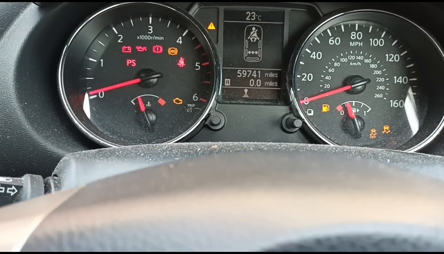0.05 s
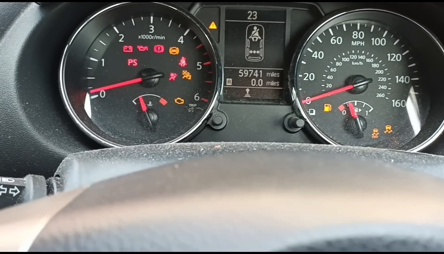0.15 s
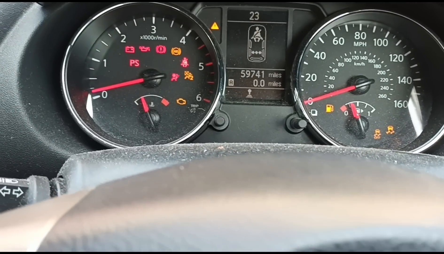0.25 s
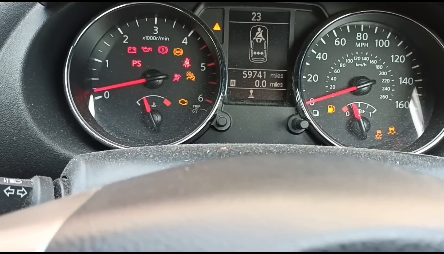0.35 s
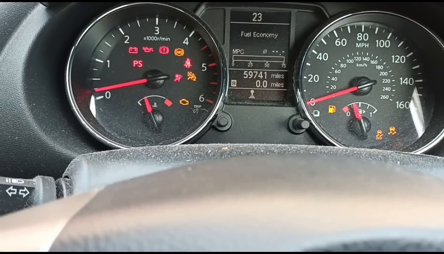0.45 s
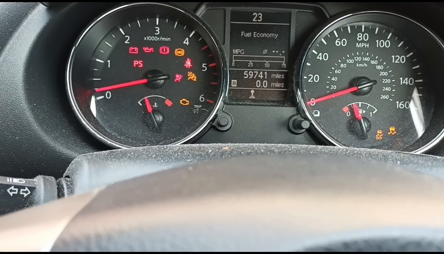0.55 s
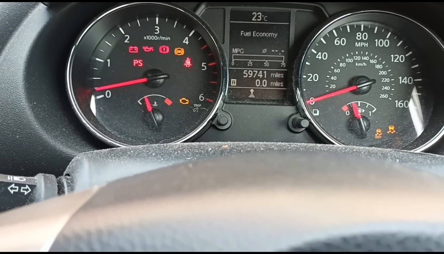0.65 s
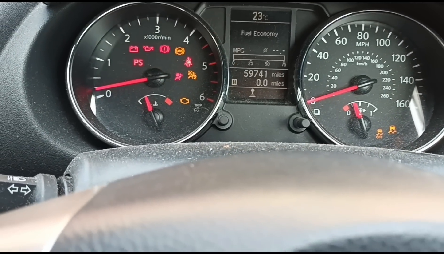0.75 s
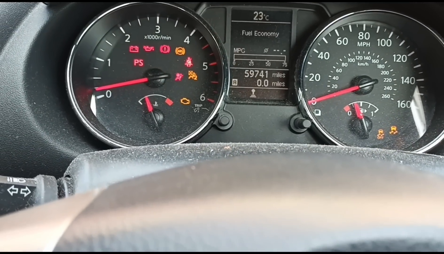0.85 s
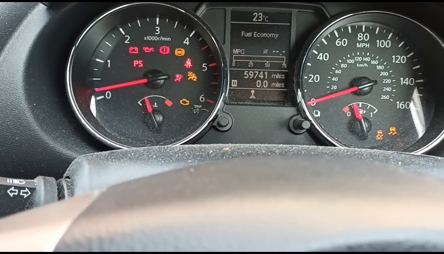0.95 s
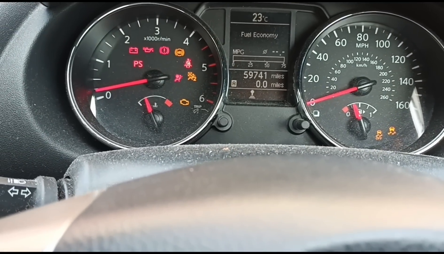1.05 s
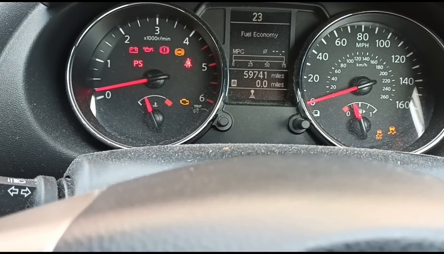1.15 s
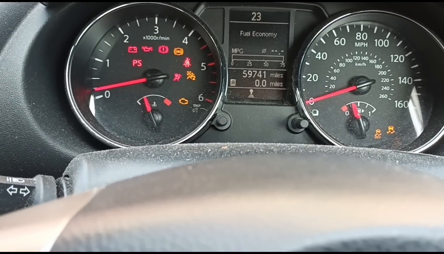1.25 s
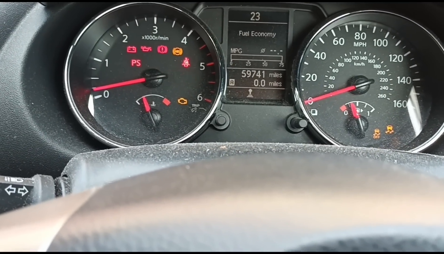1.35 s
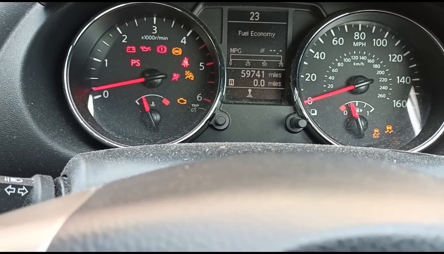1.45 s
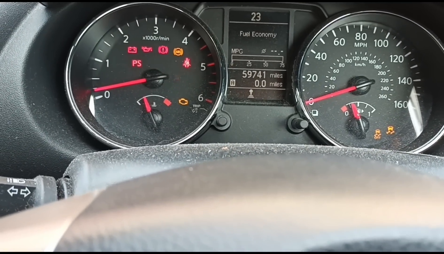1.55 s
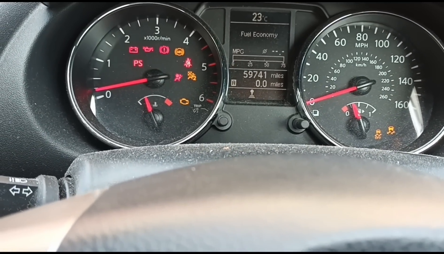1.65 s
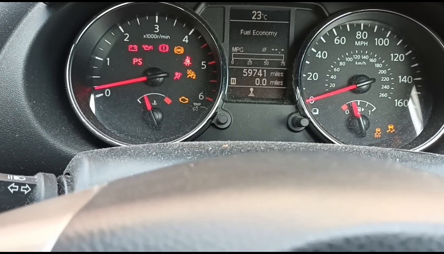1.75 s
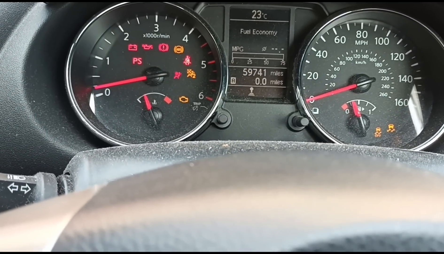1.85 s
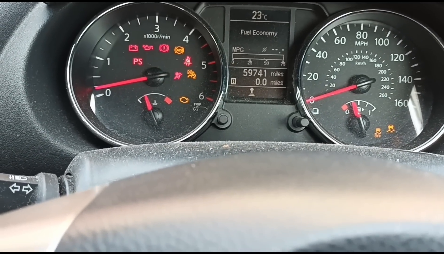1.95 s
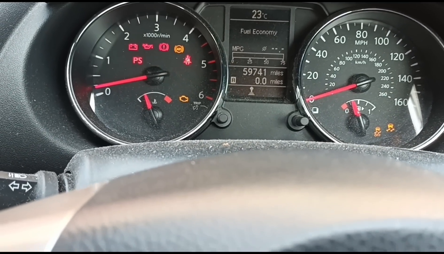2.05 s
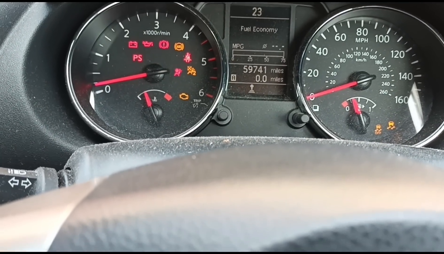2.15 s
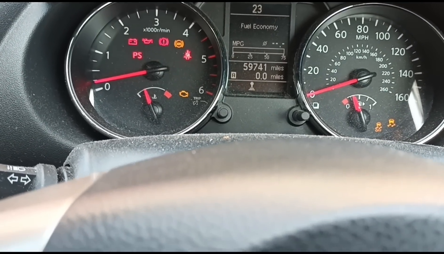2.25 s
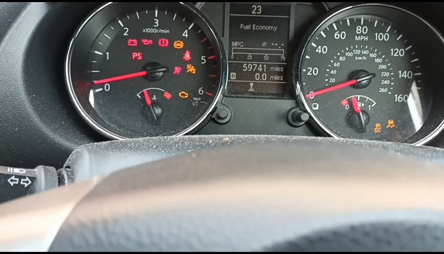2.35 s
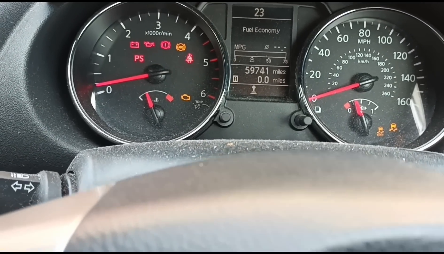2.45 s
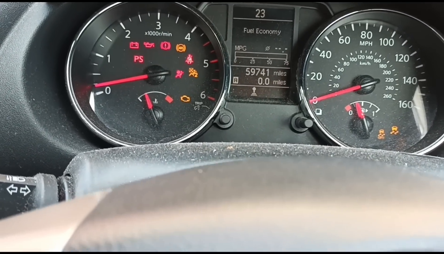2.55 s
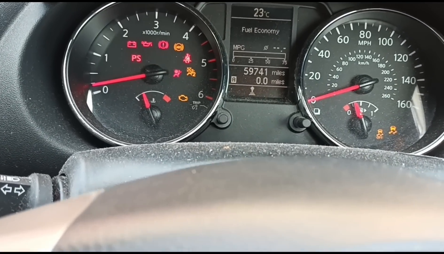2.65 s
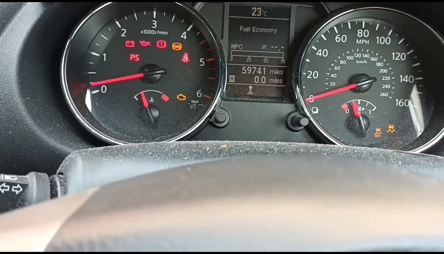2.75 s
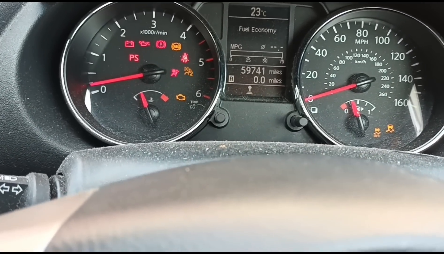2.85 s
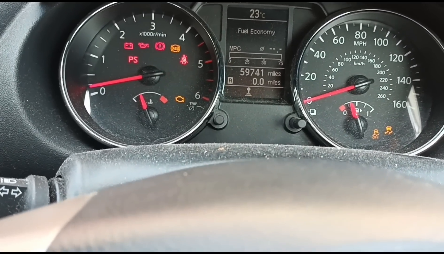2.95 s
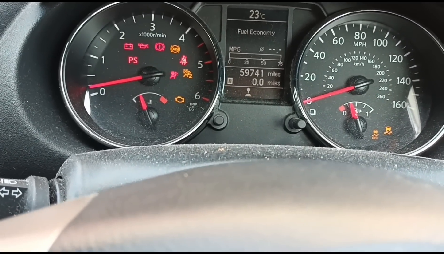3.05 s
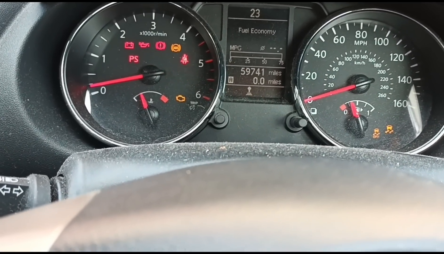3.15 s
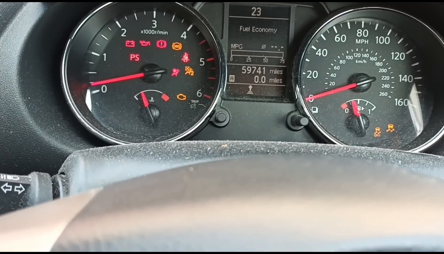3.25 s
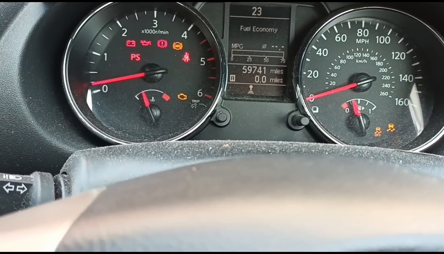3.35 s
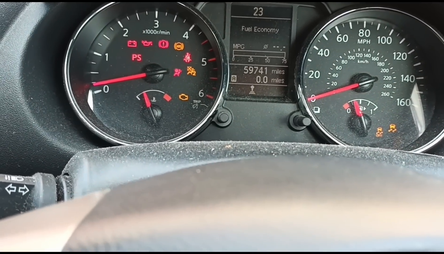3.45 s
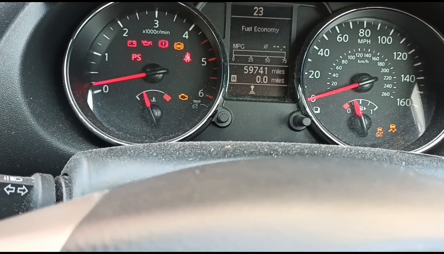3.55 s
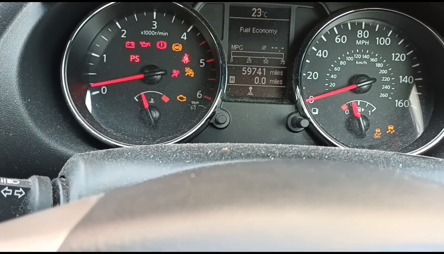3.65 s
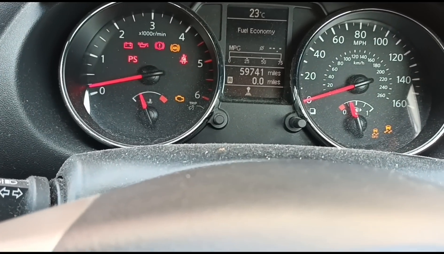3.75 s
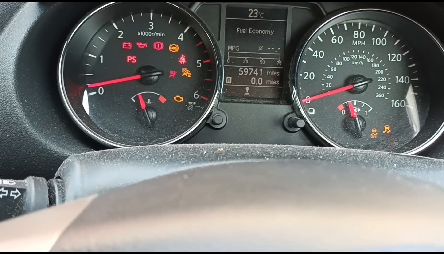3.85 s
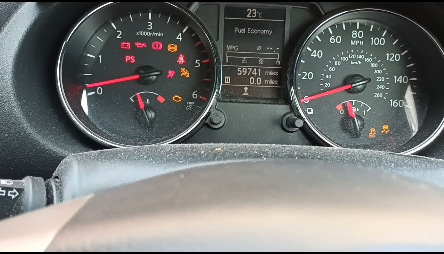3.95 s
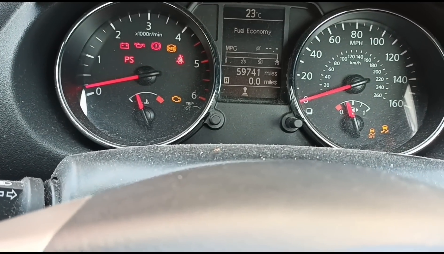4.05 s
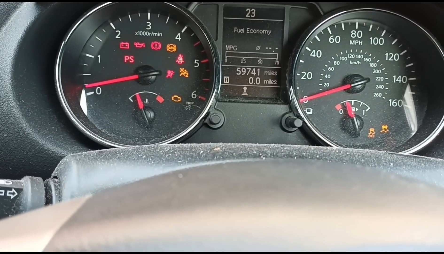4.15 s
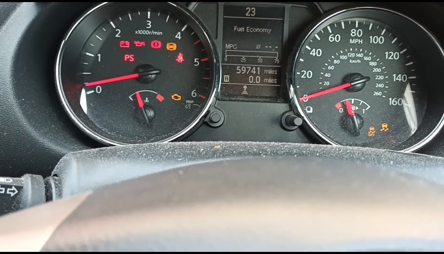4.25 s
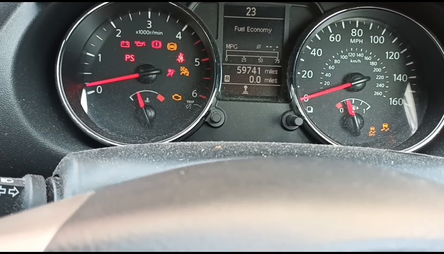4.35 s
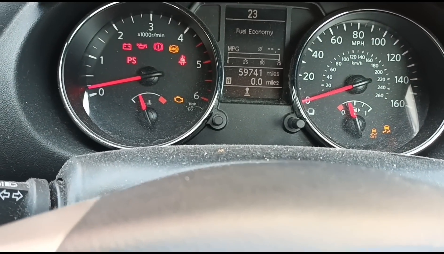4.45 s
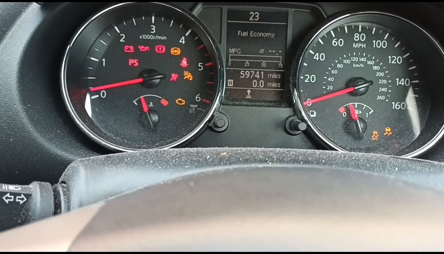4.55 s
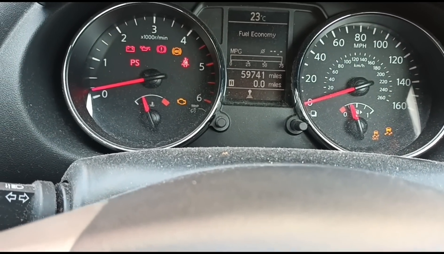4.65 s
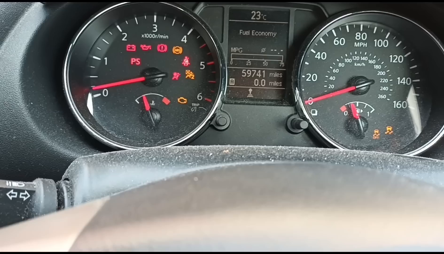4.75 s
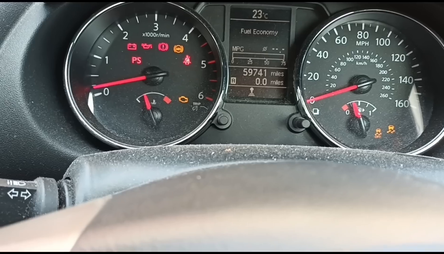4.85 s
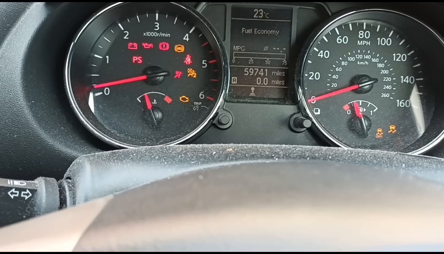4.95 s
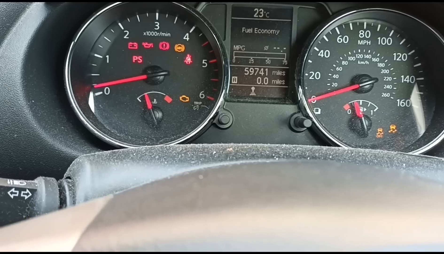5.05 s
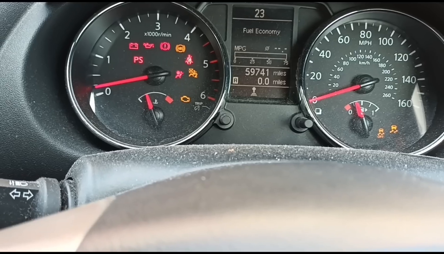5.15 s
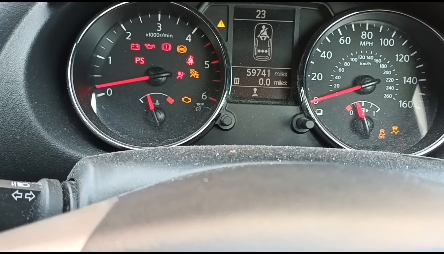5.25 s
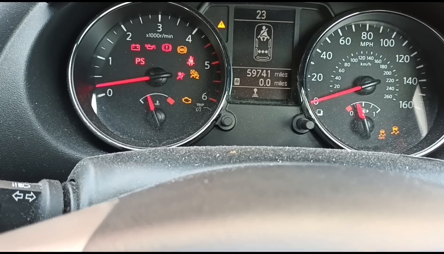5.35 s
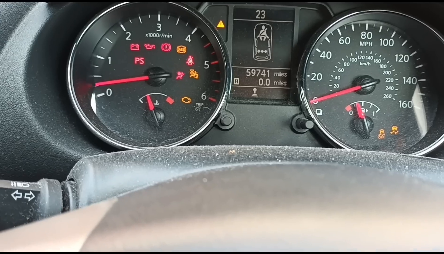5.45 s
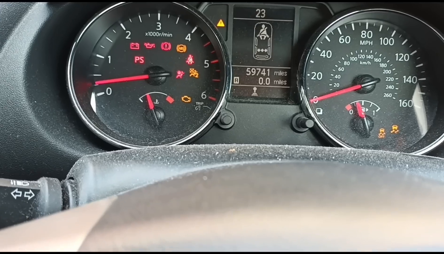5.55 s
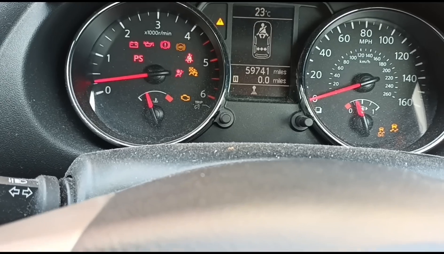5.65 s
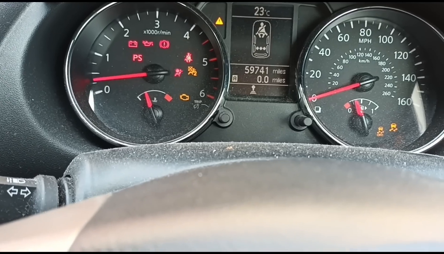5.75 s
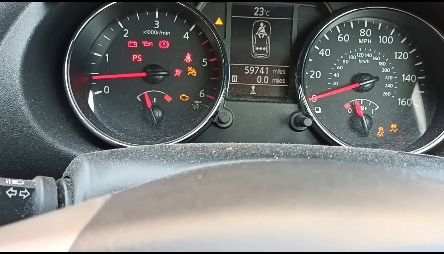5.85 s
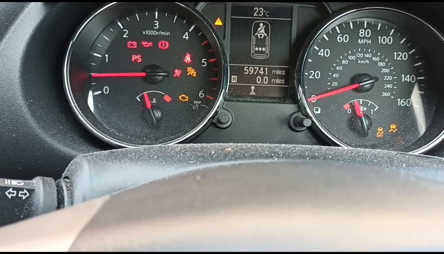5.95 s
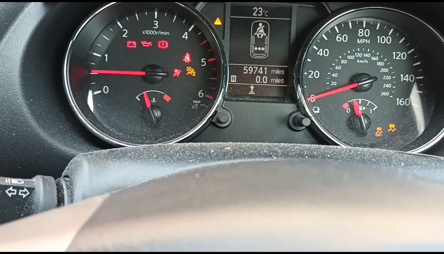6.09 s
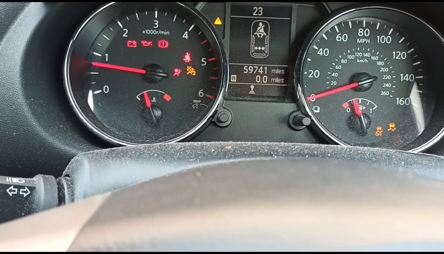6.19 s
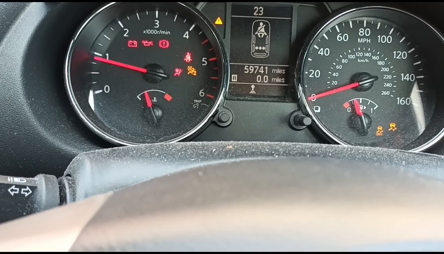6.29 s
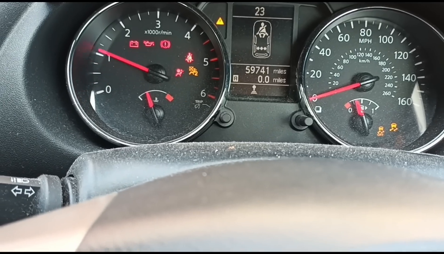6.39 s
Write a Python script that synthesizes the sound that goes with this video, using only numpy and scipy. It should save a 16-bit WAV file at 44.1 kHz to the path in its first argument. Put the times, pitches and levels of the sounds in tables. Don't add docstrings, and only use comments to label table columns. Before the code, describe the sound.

Close inside a parked car, a starter is already cranking a diesel, its gear whine sagging and recovering about five or six times a second with dull thumps below. A small rustle and clicks pass early on. After four seconds rough firings boom and shudder, keys and trim rattle sharply, and the engine catches, its pitch climbing into a clattering rumble. Handheld stereo phone, bassier on the left.

```python
import sys
import numpy as np
from scipy import signal
from scipy.fft import rfft, irfft, next_fast_len
from scipy.io import wavfile
from scipy.ndimage import uniform_filter1d

SR = 44100
rng = np.random.default_rng(int(sys.argv[2]) if len(sys.argv) > 2 else 0)


def invert_db(x):
    u = np.asarray(x, float) / 20
    return 10 ** u


def materialize(psi):
    bounded = np.clip(np.atleast_2d(psi).T, -1, 1)
    quanta = np.round(bounded * 32767).astype(np.int16)
    wavfile.write(sys.argv[1], SR, quanta)


N = 283122
T = np.arange(N) / SR
SIZE = next_fast_len(N + 999)
HZ = np.fft.rfftfreq(SIZE, 1 / SR)

# (frequency [Hz], density [dB per Hz])
KEY_SPECTRUM = [(710, -44), (1200, -4.5), (2330, 2.5), (3580, 3.5), (4200, 4.5), (4530, 5), (5260, 2.5),
                (7480, 2.5), (10100, 4), (12600, -10), (15500, -7.5)]


def along(points, hz):
    f, v = np.transpose(points)
    return np.interp(np.log(np.maximum(hz, 1)), np.log(f), v)


def colour(x, points):
    y = irfft(rfft(x, SIZE) * invert_db(along(points, HZ)), SIZE)[..., :N]
    return y / np.std(y)


def band(x, hz, width):
    return signal.lfilter(*signal.iirpeak(hz, hz / width, SR), x)


def decay(t, t60):
    return np.exp(-np.log(1000) * t / t60)


def curves(table, off_db=-120):
    s, *columns = np.transpose(table)
    gate = np.interp(T, [s[0] - .02, s[0], s[-1], s[-1] + .02], [off_db, 0, 0, off_db])
    return [np.interp(T, s, c) for c in columns] + [gate]


def walk(rate):
    k = int(SR / rate)
    steps = np.repeat(rng.standard_normal(N // k + 1), k)
    y = uniform_filter1d(uniform_filter1d(steps, k), k)[:N]
    return y / np.std(y)


def sine(hz):
    return np.sqrt(2) * np.sin(2 * np.pi * np.cumsum(hz) / SR + 2 * np.pi * rng.random())


def add(out, s, x):
    i = max(int(s * SR), 0)
    out[..., i:i + x.shape[-1]] += x[..., :N - i]


def swells(rows, rise_db_s, fall_db_s):
    total = 0
    for s, hold, db, end_db in rows:
        end = s + abs(hold)
        level = np.interp(T, [s, end], [db, end_db])
        level = level - rise_db_s * np.maximum(s - T, 0) - fall_db_s * np.maximum(T - end, 0)
        total = total + invert_db(level)
    return total


def noise():
    # (frequency [Hz], share [0-1])
    coherence = [(20, 0.77), (120, 1), (300, 0.48), (750, 0.18), (1200, 0.03), (3000, 0), (15000, 0.14)]
    both, *own = np.exp(2j * np.pi * rng.random((3, len(HZ))))
    alike = np.clip(along(coherence, HZ), 0, 1)
    spectrum = np.sqrt(alike) * both + np.sqrt(1 - alike) * np.array(own)
    return irfft(spectrum, SIZE)[:, :N] * np.sqrt(SIZE)


def strokes():
    # (time [s], length [s], whine re cylinder [dB],
    # lowest tone re cylinder [dB], delay until the crank brakes hardest [s])
    stroke_times = [(-0.08, 0.091, -0.5, -1, .066), (0.088, 0.099, -0.5, -2, .066),
                    (0.26, 0.099, -1.5, 1.5, .07), (0.431, 0.12, -1.5, 0.5, .065), (0.631, 0.1, -2, 3, .06),
                    (0.807, 0.094, 0, 1.5, .063), (0.978, 0.098, -1.5, 3, .07),
                    (1.147, 0.12, -1, -2.5, .07), (1.346, 0.11, -1.5, 1, .065),
                    (1.516, 0.12, -2, 2.5, .072), (1.708, 0.1, -2, 4, .064), (1.873, 0.122, -1, 0, .068),
                    (2.072, 0.1, -1.1, 3.5, .064), (2.26, 0.11, 0, 3, .063), (2.438, 0.11, -1.5, 1.5, .067),
                    (2.617, 0.12, -1.1, -1, .061), (2.809, 0.11, -1.5, 5, .066),
                    (3.003, 0.1, -0.5, 3.5, .062), (3.184, 0.11, -1, 1, .063), (3.359, 0.13, -1, 0.5, .062),
                    (3.56, 0.11, -2, 8.5, .063), (3.75, 0.11, -2, 4, .062), (3.934, 0.099, -1.5, 2, .064),
                    (4.106, 0.14, -2, 0.5, .065)]
    # (whine [dB], lowest mesh tone re whine [dB], mount thump delay [s],
    # thump [dB], peak of the lowest tone re braking [ratio])
    cylinders = [(-48, 1.5, 0.0154, -34, 1.14), (-48, 8, 0.021, -31, 1.204), (-48, -0.5, 0.0175, -31, .92),
                 (-47, 10, 0.00955, -31, 1.28)]
    # (time [s], length [s], whine [dB], lowest tone re whine [dB], mesh rate re cranking [ratio])
    kick_times = [(4.313, 0.056, -48, 1, 1.01), (4.424, 0.048, -51, -12, 1.18),
                  (4.524, 0.043, -48.5, -9, 1.22), (4.623, 0.057, -46, 4.5, 1.17),
                  (4.757, 0.063, -52.5, 3, 1.15), (4.841, 0.044, -50.5, -6, 1.26)]
    kick_delay_s, kick_db = 0.0346, -27
    rows = []
    for i, (s, length, db, low_db, brake) in enumerate(stroke_times):
        whine, low, delay, thump, peak = cylinders[i % len(cylinders)]
        rows.append((s, length, whine + db, low + low_db, delay, thump, brake, 1, peak))
    for s, length, db, low_db, rate in kick_times:
        rows.append((s, length, db, low_db, kick_delay_s, kick_db, .97 * length, rate, .7))
    return rows


def mount_thump(t):
    # (frequency [Hz], level [dB], T60 [s])
    mounts = [(45, 3.5, 0.24), (67.8, 2.5, 0.18), (107.4, -7.5, 0.32)]
    modes = sum(invert_db(db) * decay(t, t60) * np.sin(2 * np.pi * f * t) for f, db, t60 in mounts)
    return modes * np.clip(t / 0.008, 0, 1)


def starter():
    # (time re hardest braking [ratio], mesh rate [Hz])
    mesh_hz = [(0, 390), (.45, 381.3), (.7, 367.3), (1.01, 320.2), (1.28, 277.4), (1.6, 257.9),
               (2.1, 294.9)]
    mesh_db = [-8, -12.5, -17, -15.5, -28]
    # (frequency [Hz], width [Hz], level [dB])
    housing_modes = [(267, 28, 1.5), (343.5, 19.3, 9), (460.6, 19, 13.5), (632, 52, 8), (740, 15.7, 7.5),
                     (853, 12, 3.5), (1153, 18, 7), (1393, 12, 6.5), (1555, 83, 1), (1756, 37, 9),
                     (2200, 334, -8.5), (4410, 120, 4), (5670, 570, 3.5)]
    # (frequency [Hz], density [dB per Hz])
    grind_spectrum = [(88, -43), (150, -55), (179, -9.5), (320, -2.5), (509, -12.5), (736, -7), (844, -5.5),
                      (1730, -16), (2410, -22), (4480, -25), (4930, -29), (6470, -29), (15500, -45.5)]
    brake_hz, brake_width_hz, brake_db = 338, 35, 7.5
    free_db_per_hz = 5.3
    bite_s, bite_share = .004, .2
    load, low, hz, thumps = np.zeros(N), np.zeros(N), np.full(N, 300.), np.zeros(N)
    thump = mount_thump(T[:SR // 2])
    for s, length, db, low_db, delay, thump_db, brake, rate, peak in strokes():
        near = slice(max(int((s - .03) * SR), 0), int((s + .25) * SR))
        since = T[near] - s
        pace = length / 0.08
        late = 0.018 * max(.95 - pace, 0)
        rise = np.clip((since + 0.017 - late) / 0.026, 0, 1)
        shape = rise * np.clip((length + 0.031 * pace - since) / (0.05 * pace), 0, 1)
        growth = np.clip(0.48 + since / 0.11 + 2.5 * (rate - 1), 0, 1)
        load[near] += invert_db(db) * shape ** 2.0 * growth
        jolt = (since > late + .004) * np.exp(-np.abs(since - late - .004) / bite_s)
        load[near] += invert_db(db) * bite_share * jolt
        braking = 0.27 + np.exp(-((since / brake - peak) / 0.32) ** 2)
        low[near] += invert_db(db + low_db - 7.0) * shape * braking
        hz[near] = np.interp(since / brake, *np.transpose(mesh_hz)) * rate
        add(thumps, s + delay - .006, invert_db(thump_db - 5.5) * thump)
    hz *= 1 + .005 * walk(70)
    first = low * invert_db(2.2 * walk(70)) * sine(hz)
    swell_db = brake_db * np.exp(-((hz - brake_hz) / brake_width_hz) ** 2)
    second = invert_db(mesh_db[0] + swell_db) * invert_db(4 + 1.5 * walk(50)) * sine(2 * hz)
    upper = np.zeros((2, N))
    free_db = free_db_per_hz * np.maximum(hz - 392, 0)
    for port in range(2):
        for k, db in enumerate(mesh_db[1:], 3):
            upper[port] += invert_db(db + 3.55 * walk(40) - free_db) * sine(k * hz)
    grind = colour(noise() * invert_db(1.17 * walk(150)), grind_spectrum)
    teeth = load * (second + upper + invert_db(0.5) * grind) + first
    housing = sum(invert_db(db) * band(teeth, f, w) for f, w, db in housing_modes)
    shake = band(rng.standard_normal(N), 58.4, 5.9)
    shake = shake + invert_db(-10.5) * band(rng.standard_normal(N), 34.0, 52.0)
    return invert_db(-2.5) * teeth + invert_db(-6.5) * housing + thumps + load * invert_db(29.0) * shake


def cabin_air():
    # (frequency [Hz], density [dB per Hz])
    floor_spectrum = [(12, -12), (20, 0.5), (50, 1.5), (70, -3), (202, -19.5), (342, -19), (534, -33),
                      (746, -26.5), (1130, -30.5), (1230, -30.5), (1770, -30.5), (2610, -37), (6360, -37),
                      (11000, -46), (15500, -53)]
    return invert_db(-48.5 + .7 * walk(4)) * colour(noise(), floor_spectrum)


def ticks(white):
    # (time [s], peak level [dB], ring [Hz])
    tick_times = [(1.445, -56.5, 9520), (1.471, -64, 9000), (1.783, -45, 7500), (2.0395, -45.5, 2200),
                  (2.0418, -45, 4760), (2.045, -56, 6200), (4.272, -54.5, 9200), (4.3197, -57, 7240),
                  (4.4957, -52, 8740), (4.529, -57, 8800), (4.5785, -54.5, 8540), (4.6607, -54.5, 9350),
                  (4.7137, -57, 8550), (4.8425, -56, 8950), (5.033, -46.5, 2866), (5.04, -58, 7500),
                  (5.049, -52, 8900), (5.0559, -50.5, 9100), (5.0563, -48.5, 13500), (5.062, -60, 9800),
                  (5.07, -66, 9000), (5.0893, -48, 5960), (5.097, -53, 6100), (5.2963, -53, 7470),
                  (5.478, -42, 8780), (5.4875, -36, 7230), (5.499, -29.5, 7200), (5.5062, -24, 7100),
                  (5.511, -29, 8620), (5.518, -31.5, 6000), (5.527, -50, 9600), (5.56, -48.5, 3840),
                  (5.561, -42.5, 7950), (5.577, -42, 8350), (5.606, -47, 3120), (5.613, -49, 7000),
                  (5.6334, -52, 4950), (5.6925, -50, 8040), (5.7013, -43.5, 7200), (5.716, -50, 14700),
                  (5.719, -42, 10000), (5.73, -50, 8500), (5.7412, -40.5, 8400), (5.755, -41.5, 7500),
                  (5.765, -47, 9000), (5.816, -52, 8000), (5.822, -57, 6000), (5.841, -58, 4500),
                  (5.9616, -50, 4060), (6.1802, -47.5, 4600), (6.2744, -59, 5350)]
    splash_t60_s, crack_s = 0.045, 0.0037
    ring_share, ring_t60_s = .5, .04
    out, t = np.zeros((2, N)), T[:SR // 8]
    bright = colour(white, KEY_SPECTRUM)
    for s, db, hz in tick_times:
        splash = bright[:, int(s * SR):][:, :len(t)] * decay(t, splash_t60_s)
        tick = (0.41 + 1.2 * np.exp(-t / crack_s)) * splash + 3.2 * band(splash, hz, 1700)
        ring = ring_share * decay(t, ring_t60_s) * np.sin(2 * np.pi * hz * t)
        add(out, s, invert_db(db - 9.0) * (tick + ring))
    return out


def bumps():
    # (time [s], peak level [dB], ring [Hz])
    bump_times = [(1.546, -28, 86), (1.62, -34, 119), (1.714, -22, 108.3), (1.759, -32, 119),
                  (2.051, -27, 105.4), (2.116, -32, 78), (5.07, -31.5, 222), (4.56, -37, 99),
                  (4.75, -37, 90), (4.975, -29, 120), (4.899, -38, 190), (5.0, -39, 205), (5.065, -25, 135),
                  (5.164, -22, 122), (5.254, -28, 124), (5.288, -33, 72.6), (5.345, -27, 81),
                  (5.201, -37, 148), (5.329, -38, 102), (5.36, -41, 338), (5.621, -32, 162),
                  (5.686, -30.5, 181), (5.926, -31, 292)]
    out, t = np.zeros(N), T[:SR // 8]
    envelope = decay(t, 0.097) * np.clip(t / 0.022, 0, 1)
    for s, db, hz in bump_times:
        add(out, s, invert_db(db + 7.0) * envelope * np.sin(2 * np.pi * hz * t))
    return out


def jingle(x):
    # (frequency [Hz], width [Hz], level [dB])
    ring_modes = [(3700, 30, 4), (4415, 83, -9), (4820, 44, -3), (6640, 99, -3), (7340, 80, -10),
                  (8500, 38, 5), (9000, 27, 2), (9400, 80, 3), (9590, 42, -7), (10100, 55, -10),
                  (12000, 41, -8), (12100, 52, -10), (14100, 280, -18), (14800, 150, -20.5)]
    rings = sum(invert_db(db) * w / (w + 2j * (HZ - f)) for f, w, db in ring_modes)
    y = irfft(rfft(x, SIZE) * invert_db(along(KEY_SPECTRUM, HZ)) * (1 + 1.7 * rings), SIZE)[..., :N]
    return y / np.std(y)


def rustle():
    # (time [s], hold [s], start level [dB], end level [dB])
    sleeve_strokes = [(1.575, 0.029, -51.5, -53), (1.65, 0.084, -75, -69), (1.722, 0.079, -51.5, -52.5),
                      (1.89, 0.057, -77.5, -58), (1.96, 0.085, -63.5, -50)]
    # (frequency [Hz], density [dB per Hz])
    firm_cloth = [(880, 3.5), (1500, 2.5), (1770, -1), (1860, 1.5), (2620, -0.5), (3380, 0.5), (7900, -2.5),
                  (8880, 2), (11000, -9), (14000, -17), (15500, -20)]
    # (frequency [Hz], density [dB per Hz])
    soft_cloth = [(880, 7.5), (1800, -6), (3400, 0.5), (6500, -5), (9500, -3.5), (11000, -14), (15500, -21)]
    # (time [s], hold [s], start level [dB], end level [dB])
    key_swings = [(5.05, 0.011, -59, -69), (5.098, 0.0062, -61, -60), (5.48, 0.042, -40.5, -35),
                  (5.56, 0.078, -72, -52.5), (5.702, 0.073, -51.5, -48.5), (5.79, 0.1, -60, -63.5),
                  (5.908, 0.16, -56, -71)]
    grains = noise() * invert_db(0.64 * walk(300) + 1.13 * walk(40))
    sleeve = swells(sleeve_strokes[:3], 108.0, 170) * colour(grains, firm_cloth)
    sleeve = sleeve + swells(sleeve_strokes[3:], 103.0, 170) * colour(grains, soft_cloth)
    keys = invert_db(1.0) * swells(key_swings, 3000, 870)
    return sleeve * invert_db(1.5 + 0.6 * walk(90)) + keys * jingle(grains * invert_db(1.2 * walk(110)))


def knocks(white):
    # (time [s], peak level [dB], ring [Hz])
    knock_times = [(2.039, -38.5, 1560), (2.0414, -48, 2980), (2.0408, -64, 6300), (5.924, -62, 2500),
                   (5.181, -50, 740), (5.4225, -46, 674), (5.478, -28, 1030), (5.523, -31, 800),
                   (5.525, -55, 2000), (5.61, -50, 700), (5.747, -35.5, 580), (5.922, -37.5, 1260),
                   (4.9498, -49, 1800), (4.982, -55, 1710), (5.034, -44, 2800), (5.0595, -49, 1700),
                   (5.1028, -47, 2010), (5.108, -47.5, 2887), (4.632, -45, 935), (5.712, -50, 2600),
                   (5.742, -51, 2700), (5.1407, -58, 2020), (5.209, -53, 2770), (5.2294, -51, 1920),
                   (5.2594, -60, 1934)]
    out, t = np.zeros((2, N)), T[:SR // 8]
    envelope = decay(t, 0.057) * np.clip(t / 0.0026, 0, 1)
    for s, db, hz in knock_times:
        scatter = band(band(white[:, int(s * SR):][:, :len(t)], hz, 1100), hz, 1350)
        ring = 0.46 * np.sin(2 * np.pi * hz * t) + 3.15 * scatter
        add(out, s, invert_db(db + 3.0) * envelope * ring)
    return out


def rattles():
    white = noise()
    return ticks(white) + knocks(white) + bumps()


def catching():
    # (time [s], boom [Hz], shaking level [dB])
    shake_curve = [(4.25, 30.74, -41), (4.36, 31.2, -40), (4.5, 32.53, -34), (4.62, 43.65, -40.5),
                   (4.85, 45, -38), (4.93, 39.4, -31), (5.09, 46.8, -28.5), (5.22, 47.6, -36.5),
                   (5.3, 43.96, -34), (5.36, 41.5, -37)]
    # (time [s], frequency [Hz], level [dB])
    surge_curve = [(4.86, 94.6, -42), (4.868, 96, -61), (4.886, 101.4, -35), (4.95, 112.7, -36),
                   (5.078, 132.6, -38.5), (5.14, 134.5, -60)]
    # (time [s], hold [s], start level [dB], end level [dB])
    pumps = [(4.375, 0.019, -30.5, -28), (4.46, 0.051, -34, -35), (4.582, 0.063, -25.5, -28.5),
             (4.7, 0.032, -30.5, -30), (4.806, 0.051, -17, -25), (4.9, .2, -17.5, -12.5),
             (5.15, 0.01, -34, -34), (5.206, 0.12, -17, -36), (5.362, 0.11, -26.5, -45)]
    # (time [s], hold [s], start level [dB], end level [dB])
    buzz_times = [(4.85, 0.016, -55, -53), (4.93, 0.14, -72, -52.5), (5.2, 0.024, -72, -62.5),
                  (5.31, 0.036, -64, -49.5), (5.422, .04, -56, -49)]
    hz, shudder_db, _ = curves(shake_curve)
    gate = np.interp(T, [4.23, 4.25, 5.44, 5.48], [-120, 0, 0, -120])
    rock_db, rock_per_shake = -37, 1
    rock_db = rock_db + rock_per_shake * (shudder_db - rock_db)
    boom = sine(hz * (1 + 0.024 * walk(29)))
    surge_hz, *surge_db = curves(surge_curve)
    surge = invert_db(sum(surge_db) + 2.5 * walk(30.1)) * sine(surge_hz)
    lumps = noise() * invert_db(2.4 * walk(45))
    shudder = colour(lumps, [(40, -15), (75, 8.5), (130, 3.5), (220, -6.5), (400, -18.5), (900, -35),
                             (3000, -40.5), (7000, -46), (11000, -52), (15500, -78)])
    rock = colour(rng.standard_normal(N), [(10, -44), (19, 3), (26, 19.5), (34, 17.0), (55, -57.0)])
    buzz = colour(lumps, [(200, -4), (400, -22), (700, 9.5), (1500, -7.5), (3000, -25.0), (6000, -16.5),
                          (15000, -33)])
    body = invert_db(shudder_db - 2.5) * shudder * (1 + 0.25 * boom) + surge + invert_db(rock_db) * rock
    trim = invert_db(-4.5) * swells(buzz_times, 250, 120) * buzz * (1 + 0.069 * boom)
    return invert_db(gate) * (swells(pumps, 580, 500) * boom + body) + trim


def cabin(hz):
    # (frequency [Hz], width [Hz], level [dB])
    cabin_modes = [(51, 8.7, -2), (65.8, 4.5, -3), (86.3, 5.6, -1), (104.6, 8.8, 2.5), (115.7, 5.4, -1),
                   (152.7, 48, -7.5), (183.1, 8.7, -8.5), (222, 7, -10), (243.4, 16, -3.5),
                   (265.4, 16, -0.5), (292, 9.4, 6)]
    grid = np.arange(600.)
    response = sum(invert_db(db) * w / (w + 2j * (grid - f)) for f, w, db in cabin_modes)
    return np.interp(hz, grid, np.abs(response) ** 1.25)


def firing_orders(hz, load_db, unequal_db):
    orders_db = [-19.5, -28, -36.5, -62, -55]
    # (multiple of the firing rate [ratio], level [dB])
    part_orders = [(.25, -54), (.5, -49), (.75, -52.5), (1.25, -51), (1.5, -47.5), (1.75, -51),
                   (2.25, -56.5), (2.5, -58), (3.5, -64.5), (4.5, -61.5)]
    uneven_db, wobble = .7, .006
    tones = 0
    for k, db in enumerate(orders_db, 1):
        level = invert_db(db + load_db + uneven_db * k * walk(30))
        tones = tones + level * cabin(k * hz) * sine(k * hz * (1 + wobble * walk(40)))
    for k, db in part_orders:
        level = invert_db(db + unequal_db + 3.0 * walk(25))
        tones = tones + level * sine(k * hz * (1 + 2 * wobble * walk(30)))
    return tones


def diesel_clatter(hz):
    # (frequency [Hz], density [dB per Hz])
    clatter_spectrum = [(180, -12), (300, 4.5), (439, 3.5), (517, -1), (794, 3), (863, -2.5), (1220, -3.5),
                        (1490, -10), (2250, -14.5), (5210, -20.5), (5660, -21.5), (9600, -27), (15500, -63)]
    # (frequency [Hz], width [Hz], level [dB])
    block_modes = [(372, 40, -1.5), (458.5, 7.2, 4), (857, 31, -0.5), (975, 46, -5), (1510, 140, -3.5),
                   (1700, 79, 0.5)]
    # (frequency [Hz], width [Hz], level [dB])
    head_modes = [(658, 120, -8.5), (868, 120, -10), (1083, 150, -16), (1490, 250, -14.5),
                  (1850, 260, -14.5)]
    steady_share, head_power, weak_db = 2.4, 1.6, -2
    clatter_db = -47.5 + 20 * 0.79 * np.log10(hz / 80)
    firing, phase = np.divmod(np.cumsum(hz) / SR, 1)
    index = firing.astype(int)
    strength = invert_db(1.6 * rng.standard_normal(999))[index]
    knock = .9 + strength * np.exp(-phase / .35)
    blows = np.diff(firing, prepend=0) * strength * np.sqrt(SR / hz)
    clatter = colour(noise() * knock + 0.15 * band(blows, 870, 1500), clatter_spectrum)
    clatter = invert_db(-2) * clatter + sum(invert_db(db) * band(clatter, f, w) for f, w, db in block_modes)
    uneven = blows * invert_db(weak_db * (firing % 2)) * (hz / 85) ** head_power
    shares = steady_share + rng.standard_normal((999, len(head_modes)))[index].T
    for share, (f, w, db) in zip(shares, head_modes):
        delayed = np.roll(uneven * share, int(1.5 * SR / w))
        ring = band(band(delayed, f, w), f, w)
        clatter += invert_db(db) * ring / np.std(ring[-SR // 2:])
    return invert_db(clatter_db + 4.0) * clatter


def turbo():
    # (time [s], frequency [Hz], level [dB])
    whistle = [(6.12, 4980, -70), (6.22, 5210, -72), (6.29, 5290, -63), (6.35, 5330, -68),
               (6.42, 5440, -72)]
    hz, db, gate = curves(whistle)
    return invert_db(db + gate - 3 + 2.5 * walk(60)) * sine(hz * (1 + .02 * walk(500)))


def engine():
    # (time [s], firing rate [Hz], load level [dB], inequality of the cylinders [dB])
    race = [(5.44, 41.67, -19, -12), (5.494, 44.44, -1.5, 0), (5.606, 51.82, -2.5, 11.5),
            (5.702, 58.18, -5.5, -4), (5.812, 65.22, -3.5, -0.5), (5.95, 73, 1.5, 4.5),
            (6.08, 79.7, -7.5, 0), (6.2, 85.57, -6, 6), (6.31, 90.7, -8, -6), (6.42, 91.9, -6.5, -3)]
    hz, load_db, unequal_db, gate = curves(race)
    rumble = colour(rng.standard_normal(N), [(15, -16), (29, 4), (38, 1), (60, 2), (150, 0.0), (300, 3.0),
                                             (600, -40), (15500, -62)])
    running = firing_orders(hz, load_db, unequal_db) + diesel_clatter(hz) + invert_db(-48.5) * rumble
    return invert_db(gate) * running + turbo()


def ports(x):
    # (frequency [Hz], level [dB])
    left_db = [(60, 4.5), (110, 4.5), (200, 6.5), (380, 5.0), (700, 1.0), (1290, 0.0), (2380, 0.0),
               (4400, 1.0), (8120, 2.5), (15000, 1.5)]
    lag = 41
    side = np.array([[.5], [-.5]])
    gain = invert_db(along(left_db, HZ) * side)
    delay = np.exp(-2j * np.pi * HZ * lag / SR * (side + .5))
    return irfft(rfft(x, SIZE) * gain * delay, SIZE)[:, :N]


def scene():
    return ports(starter() + cabin_air() + rattles() + rustle() + catching() + engine())


def band_limit(x):
    return signal.sosfilt(signal.butter(12, 15560, fs=SR, output="sos"), x)


def record(dry):
    return band_limit(dry)


dry = scene()
out = record(dry)
materialize(out)
```